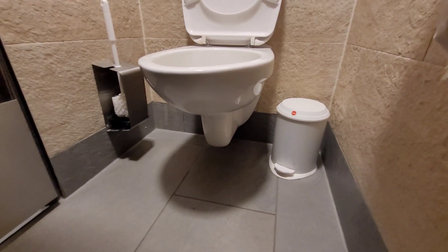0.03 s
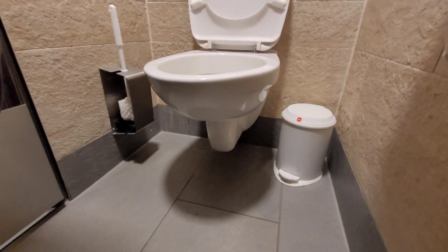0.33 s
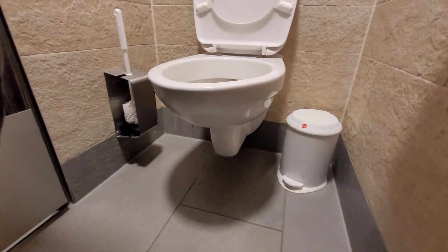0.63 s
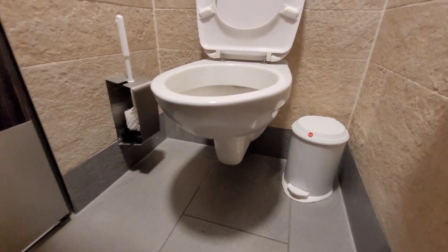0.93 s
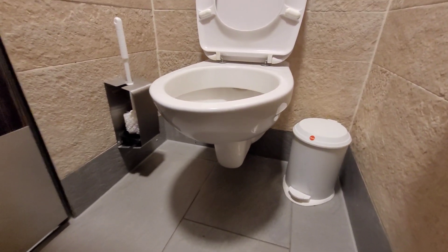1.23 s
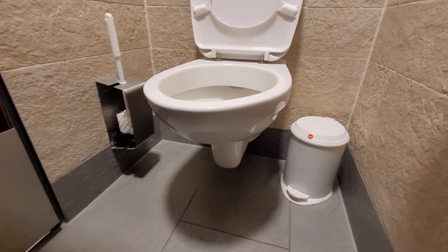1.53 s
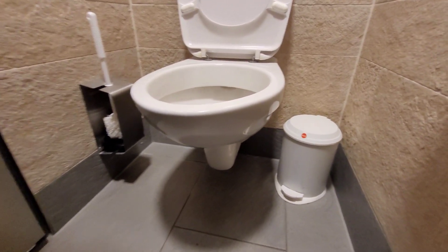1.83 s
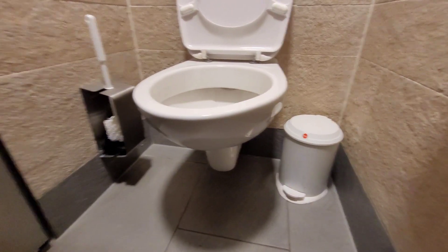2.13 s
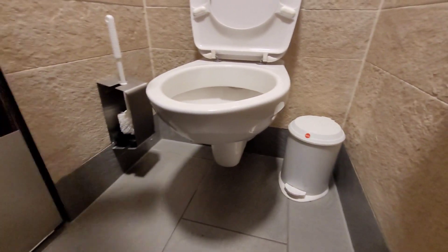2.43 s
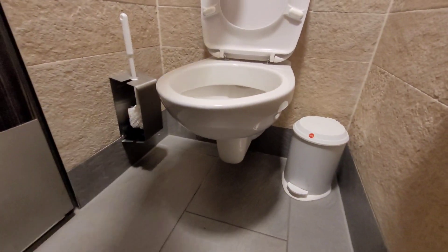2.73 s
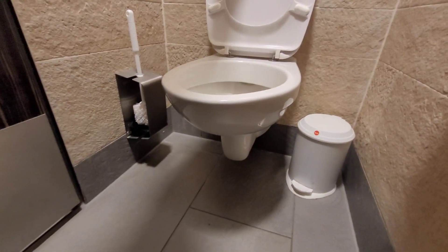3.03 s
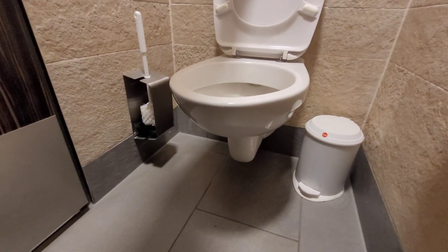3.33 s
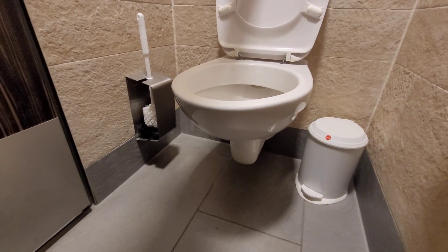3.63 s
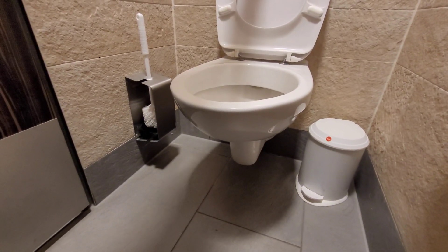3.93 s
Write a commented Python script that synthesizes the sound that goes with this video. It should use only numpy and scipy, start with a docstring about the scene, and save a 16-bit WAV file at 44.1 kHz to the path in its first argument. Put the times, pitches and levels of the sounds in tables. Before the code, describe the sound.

A toilet begins to flush in a small tiled restroom. First a low ventilation drone, soft thumps, light clicks and a faint sleeve rustle, then the button clunks and water rushes loudly into the bowl nearby.

```python
"""Small tiled restroom: a low ventilation drone, and low thumps of movement that swell into a rumble.
Something clicks lightly, a sleeve rustles, then the flush button goes in with a clunk and a thin ring.
The valve opens: water seeps, rushes down the pipe with gulps of air, and bursts into the bowl.
The water is a hail of drops and bursting bubbles that rings pipe and bowl; the room booms under it."""
import sys
import numpy as np
from scipy import signal
from scipy.fft import rfft, irfft
from scipy.io import wavfile

SR = 44100
rng = np.random.default_rng(int(sys.argv[2]) if len(sys.argv) > 2 else 0)


def bounce(signal):
    """Save signal as a 16-bit WAV file at the path given by the first command-line argument."""
    frames = np.transpose(np.atleast_2d(signal))
    limited = np.clip(frames, -1, 1)
    pcm = np.round(limited * 32767).astype(np.int16)
    wavfile.write(sys.argv[1], SR, pcm)


N = 176400
T = np.arange(N) / SR
HZ = np.fft.rfftfreq(2 * N, 1 / SR)
CENTRE = np.array([[1], [0]])  # mid only


def amp(db):
    """Decibels to gain."""
    return 10 ** (np.asarray(db) / 20)


def unit(x):
    """Scale to rms 1."""
    return x / np.sqrt(np.mean(x ** 2) + 1e-20)


def read(points, hz):
    """Interpolate on a log-frequency axis."""
    f, value = np.transpose(points)
    return np.interp(np.log(hz + 1), np.log(f + 1), value)


def level(points):
    """Gain curve through (time_s, level_db) points."""
    return amp(np.interp(T, *np.transpose(points)))


def tint(x, db):
    """Minimum-phase filter; one gain per bin of HZ."""
    log_gain = np.log(amp(np.maximum(db, -100)))
    phase = -signal.hilbert(np.r_[log_gain, log_gain[-2:0:-1]]).imag[:N + 1]
    return irfft(rfft(x, 2 * N) * np.exp(log_gain + 1j * phase))[..., :N]


def narrow(hz, width_hz):
    """Steep resonance peak; full width at quarter height."""
    return 1 / (1 + (2 * (HZ - hz) / width_hz) ** 2) ** 2


def noise(gain):
    """Mid/side noise of a given spectrum, rms 1."""
    white = rng.standard_normal((2, 2 * N))
    return unit(irfft(rfft(white) * gain)[:, :N])


def add(mix, start_s, sound):
    """Mix in place."""
    part = mix[:, round(start_s * SR):][:, :sound.shape[-1]]
    part += sound[..., :part.shape[1]]


def room(direct, t60_scale=1):
    """Mid/side response of the tiles: direct spike plus dense echoes that die by band."""
    # freq_hz, t60_s
    decay = [(100, 0.5), (400, 0.4149), (1000, .5), (2500, 0.2074), (6000, 0.3546), (15000, 0.3162)]
    hz, t, bands = signal.stft(rng.standard_normal((2, SR)), SR, nperseg=256)
    t60_s = t60_scale * read(decay, hz)[:, None]
    tail = signal.istft(bands * amp(-60 * t / t60_s), SR, nperseg=256)[1]
    tail /= np.linalg.norm(tail[0])
    tail[0, 0] += direct
    return tail / np.linalg.norm(tail[0])


def hits(rows, colour, direct, t60_scale):
    """Short blows in the room, each with its own tilt above 500 Hz."""
    out = np.zeros((2, N))
    octaves = np.log2(np.maximum(HZ, 500) / 500)
    shape_db = read(colour, HZ)
    for start_s, db, tilt_db_per_oct in rows:
        blow = np.zeros((2, N))
        add(blow, start_s, amp(db) * room(direct, t60_scale) * np.sqrt(SR / 100))  # 10 ms of energy
        out += tint(blow, shape_db + tilt_db_per_oct * octaves)
    return out / np.sqrt(np.mean(amp(shape_db) ** 2))


def drone_and_rumble():
    """Steady air drone; separately, low thumps from movement and the flush swell into a wavering rumble."""
    # freq_hz, density_db
    air = [(20, -32), (40, -6.5), (68, 1), (100, -32), (130, -4.5), (160, -13), (200, -6), (300, -5.5),
           (420, -9), (640, -18), (900, -19), (1350, -34.5), (2100, -33.5), (3300, -44.5), (7500, -41.5),
           (9500, -47.5), (16000, -47.5)]
    # pitch_hz, relative_db
    modes = [(134.6, -70), (193.8, -63.5), (247.6, -71.5), (312.2, -76), (393.0, -64), (602.9, -76.5),
             (872.1, -74)]
    # peak_s, level_db, half_length_s
    thumps = [(0.043, -48.5, 0.032), (0.22, -53.5, 0.035), (0.4, -57, 0.093), (0.658, -51, .035),
              (0.724, -48.5, 0.036), (0.908, -50, .06), (1.345, -60.5, 0.088), (2.273, -55, 0.11),
              (2.486, -54, 0.054), (2.75, -54.5, 0.082), (2.96, -50.5, 0.069), (3.156, -43.5, 0.067),
              (3.387, -53.5, 0.053), (3.583, -50, 0.021), (3.64, -48.5, 0.027), (3.753, -37, 0.044),
              (3.866, -39.5, 0.03), (3.97, -37.5, 0.067)]
    rumble_hz, waver_hz = 73.35, 6
    drone = sum(amp(db) * noise(narrow(hz, width_hz=11.3)) for hz, db in modes)
    envelope = sum(amp(db) * np.exp(-((T - peak_s) / half_s) ** 2) for peak_s, db, half_s in thumps)
    pitch_hz = rumble_hz + waver_hz * noise(narrow(0, width_hz=42.4))[0]
    rumble = envelope * unit(np.sin(2 * np.pi * np.cumsum(pitch_hz) / SR))
    return amp(-60.5) * noise(amp(read(air, HZ))) + amp(-4) * drone + rumble * CENTRE


def clicks():
    """A quick run of light clicks echoes off the tiles."""
    # start_s, level_db, tilt_db_per_oct
    ticks = [(2.1935, -47.5, -1), (2.203, -67.5, 4), (2.212, -49, -0.6), (2.230, -56, 0),
             (2.243, -60.5, 1.1), (2.257, -58.5, 1.5)]
    # freq_hz, density_db
    colour = [(90, -18), (150, -8), (290, -6), (410, 1.5), (700, -12), (1190, -18), (2050, -13),
              (3200, -24.5), (4500, -17.5), (8000, -27), (10000, -29), (15000, -23)]
    return hits(ticks, colour, direct=0.38, t60_scale=0.72)


def sleeve():
    """Cloth slides faintly as an arm reaches for the button."""
    # time_s, level_db
    envelope = [(2.3, -120), (2.52, -77.5), (2.63, -70.5), (2.85, -80), (2.97, -74), (3.06, -82),
                (3.2, -120)]
    # freq_hz, density_db
    colour = [(300, 2), (1200, -0.5), (2400, -1), (3400, -12.5), (7500, -7), (9500, -14.5), (16000, -15)]
    rustle = noise(amp(read(colour, HZ)))
    flutter_db = noise(narrow(0, width_hz=100))[0]
    return level(envelope) * rustle * amp(flutter_db)


def button():
    """The button rattles home, its plate rings, and the held mechanism squeaks thinly."""
    # start_s, level_db, tilt_db_per_oct
    knocks = [(3.053, -70, 6.5), (3.062, -42, 2.5), (3.073, -37.5, 2.4), (3.081, -32, -1.7),
              (3.090, -37, 3), (3.096, -37.5, 1.5), (3.102, -35.5, -1), (3.117, -42, -7),
              (3.136, -41.5, -5.5)]
    # freq_hz, density_db
    colour = [(40, -29), (90, -15), (140, -2), (220, -2), (360, 3), (560, -10), (800, -11.5), (1500, -17.5),
              (2300, -18), (3000, -29.5), (3700, -23.5), (4600, -33.5), (8000, -45), (16000, -58.5)]
    # pitch_hz, relative_db, t60_s
    plate = [(370.4, -22, 0.57), (492, -15, 0.6), (1544, -21, 0.28), (2290, -11.5, 0.12), (3760, -19, .12)]
    # time_s, level_db
    squeak = [(3.2, -130), (3.235, -77), (3.265, -65.5), (3.31, -72.5), (3.35, -86), (3.385, -73),
              (3.43, -81), (3.465, -80), (3.55, -90), (3.66, -110), (3.7, -130)]
    out = hits(knocks, colour, direct=0.31, t60_scale=1.2)
    t = T[:SR]
    for start_s, db, _ in knocks:
        ring = sum(amp(mode_db - 60 * t / t60_s) * np.sin(2 * np.pi * (hz * t + rng.random((2, 1))))
                   for hz, mode_db, t60_s in plate)
        add(out, start_s, amp(db) * ring)
    flutter_db = 2.5 * noise(narrow(0, width_hz=150))[0]
    return out + level(squeak) * unit(amp(flutter_db)) * noise(narrow(hz=2470, width_hz=290))


def gulps_and_booms():
    """Air pockets gulp and ring; two low booms of a room resonance swell under the flush."""
    # start_s, pitch_hz, level_db, swell_s, t60_s; the booms are the rows near 130 Hz
    tones = [(3.680, 655, -54, 0.0034, 0.17), (3.722, 129, -37, 0.021, .3), (3.756, 267, -25, 0.0063, 0.12),
             (3.787, 310, -30, 0.0035, 0.03), (3.851, 594, -24.5, 0.0026, 0.077),
             (3.877, 620, -25, 0.0035, 0.068), (3.921, 356, -12.5, 0.0018, 0.039),
             (3.933, 124.5, -30, .015, 0.26), (3.936, 401.5, -8, 0.0029, .06),
             (3.949, 257, -11.5, 0.0036, 0.051), (3.986, 384, -16, 0.0022, 0.041)]
    rise_per_s, echo_db = 0.5, -16
    out, t = np.zeros((2, N)), T[:SR // 4]
    for start_s, hz, db, swell_s, t60_s in tones:
        envelope = np.minimum(t / swell_s, 1) * amp(db - 60 * np.maximum(t - swell_s, 0) / t60_s)
        add(out, start_s, envelope * np.sin(2 * np.pi * hz * t * (1 + rise_per_s * t / 2)))
    echo = signal.fftconvolve(out, room(direct=0), axes=1)[:, :N]
    return out * CENTRE + amp(echo_db) * echo


def water(colour, start_s, rise_s, db, settle_db, settle_s, drops_per_s, spread_db):
    """One surge: drops and bursting bubbles ring pipe and bowl, swell, then settle to a steady flow."""
    # pitch_hz, half_width_hz, lift_db
    resonances = [(443, 28, 0), (607, 22.6, 11), (674, 21, 9.5), (773, 14, 5), (857, 13, 12), (961, 32, 8),
                  (1130, 27, 3.5), (1271, 25, 7.5), (1560, 120, 4.5), (1796, 40, 10.5), (2560, 83, 9),
                  (3023, 37, 15), (3420, 38, 6.5), (4900, 120, 2), (7470, 150, 4.5), (7800, 210, 6)]
    sizes = amp(spread_db * np.minimum(rng.exponential(1, N), 4)) * rng.choice([-1, 1], N)
    drops = sizes * (rng.random(N) < drops_per_s / SR)
    wet = signal.fftconvolve(drops[None], room(direct=0.38, t60_scale=0.46), axes=1)[:, :N]
    lift_db = sum(peak_db * narrow(hz, 2 * half_hz) for hz, half_hz, peak_db in resonances)
    age_s = np.maximum(T - start_s, 0)
    attack = np.minimum(age_s / rise_s, 1) ** 2
    settled = 1 - np.exp(-np.maximum(age_s - rise_s, 0) / settle_s)
    return attack * amp(db + settle_db * settled) * unit(tint(wet, read(colour, HZ) + lift_db))


def flush():
    """Water seeps past the valve, rushes and gurgles down the pipe, gushes from the rim, hits the bowl."""
    # each: freq_hz, density_db
    seep = [(60, -17.5), (110, -17), (170, -11), (270, -5.5), (550, -17.5), (900, -19), (1150, -16.5),
            (1450, -19.5), (2050, -18), (2700, -33), (3350, -31.5), (3700, -50), (5000, -41), (7700, -40),
            (10000, -48), (16000, -54)]
    rush = [(120, -29), (200, -14), (440, -11), (620, -10), (1000, -10.5), (1500, -0.5), (1850, -5.5),
            (2200, -14), (2600, -17.5), (3350, -27.5), (3700, -35), (4800, -26.5), (6500, -34.5),
            (8000, -30), (9000, -38), (16000, -40)]
    gurgle = [(60, -29), (110, -8.5), (420, -3), (620, -3), (730, -4), (1000, -19), (1300, -26),
              (1800, -28), (2600, -36), (3350, -22.5), (3700, -55)]
    gush = [(60, -34), (100, -8), (180, -12.5), (370, 5), (520, -16), (750, -42.5), (1200, -17.5),
            (1700, -36), (2300, -30), (3000, -38.5), (4500, -40.5), (7600, -40.5), (9000, -47),
            (16000, -46.5)]
    splash = [(90, -53), (150, -12), (260, 0.5), (450, -5.5), (700, -7.5), (1080, -7), (1500, -20),
              (1900, -17), (2400, -29), (3100, -28.5), (4000, -26), (5000, -33), (7800, -37.5),
              (12000, -38), (16000, -47)]
    # colour, start_s, rise_s, level_db, settle_db, settle_s, drops_per_s, spread_db
    surges = [(seep, 3.704, 0.018, -45, 8.5, 0.054, 1500, 2.5),
              (rush, 3.793, 0.018, -24, -15, 0.053, 2200, 3),
              (gurgle, 3.815, 0.032, -26.5, -4, 0.068, 700, 2),
              (gush, 3.919, 0.01, -15, -3.5, 0.058, 2500, 3),
              (splash, 3.981, 0.0083, -13.5, -2, 0.059, 2800, 4)]
    return sum(water(*surge) for surge in surges)


def scene():
    """Sum in mid/side, spread to left/right; the bass stays near the middle."""
    # freq_hz, side_gain_db
    width = [(60, -14.5), (130, -31.5), (380, -10.5), (520, -3), (1000, -1.5), (4000, 0.5), (15000, -0.5)]
    # freq_hz, left_over_right_db
    balance = [(60, 1.1), (300, -2.8), (1000, -2), (2200, -7), (4000, -1.5), (8000, -4), (15000, 3)]
    mid, side = drone_and_rumble() + clicks() + sleeve() + button() + flush() + gulps_and_booms()
    side = tint(side, read(width, HZ))
    lean_db = read(balance, HZ) / 2
    return np.array([tint(mid + side, lean_db), tint(mid - side, -lean_db)])


def record(dry):
    """Steep low-pass band limit."""
    cutoff_hz = 15850
    taps = signal.firwin(511, cutoff_hz, window=("kaiser", 9), fs=SR)
    return signal.oaconvolve(dry, taps[None], "same")


dry = scene()
out = record(dry)
bounce(out)
```